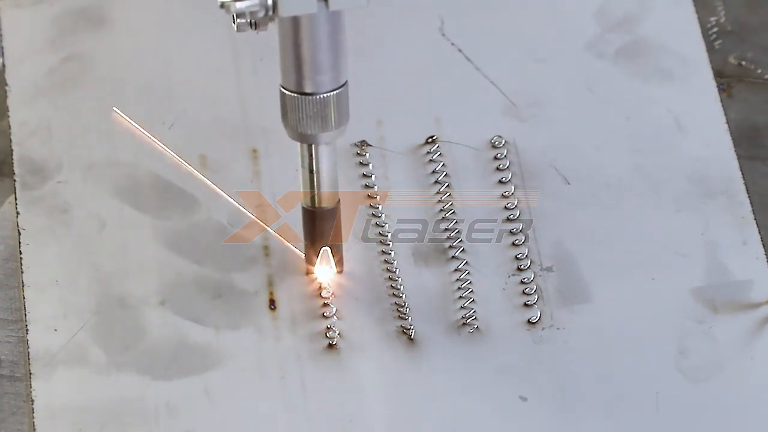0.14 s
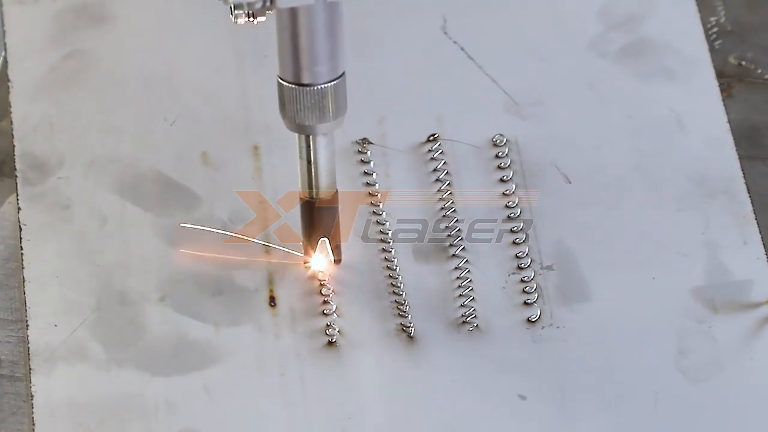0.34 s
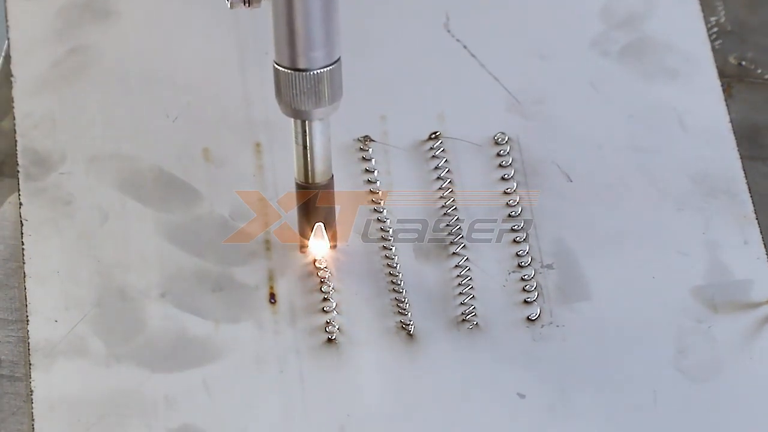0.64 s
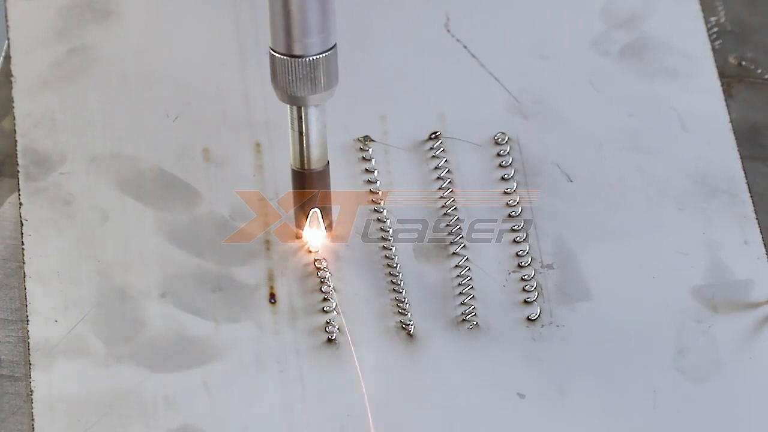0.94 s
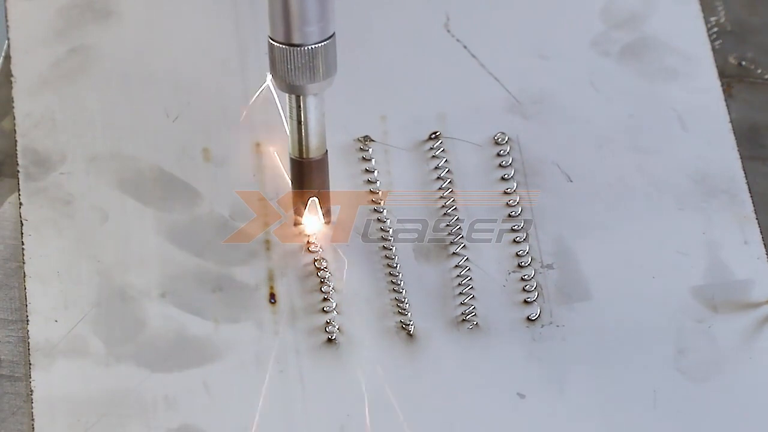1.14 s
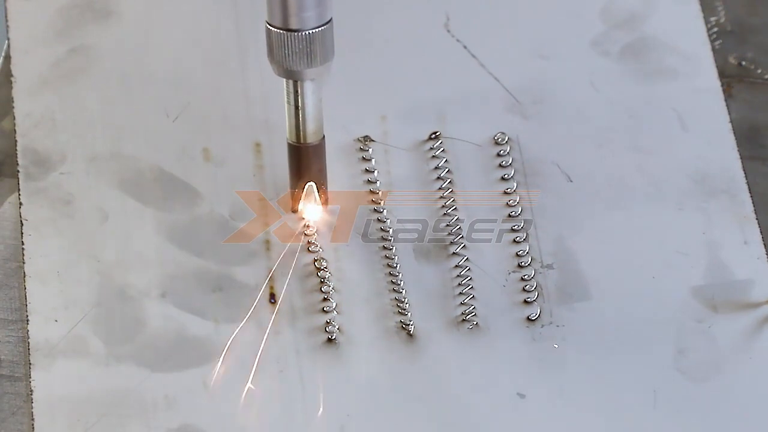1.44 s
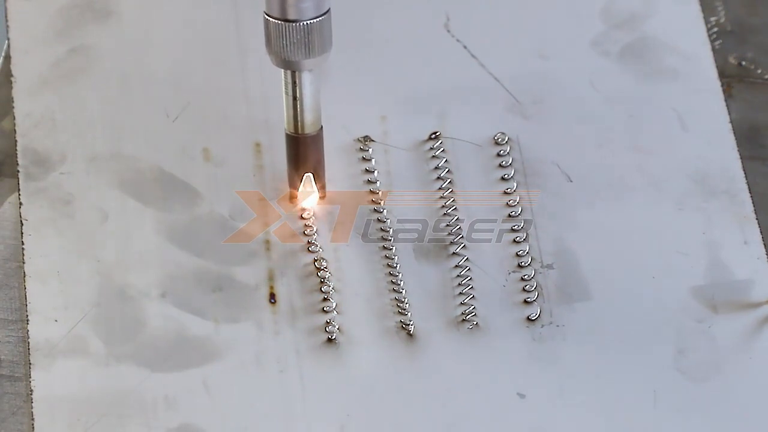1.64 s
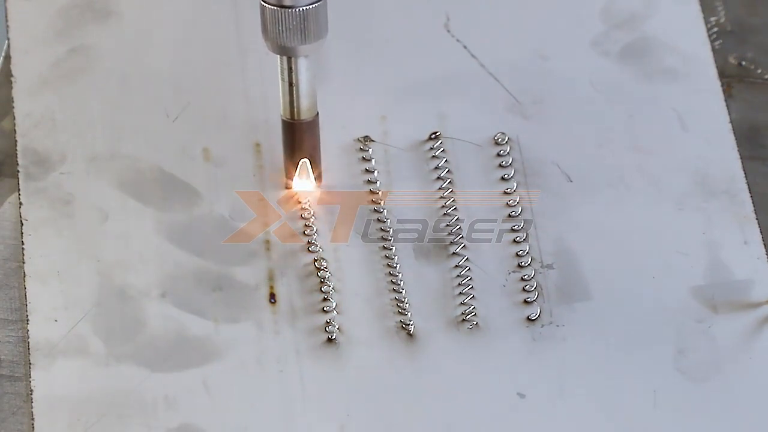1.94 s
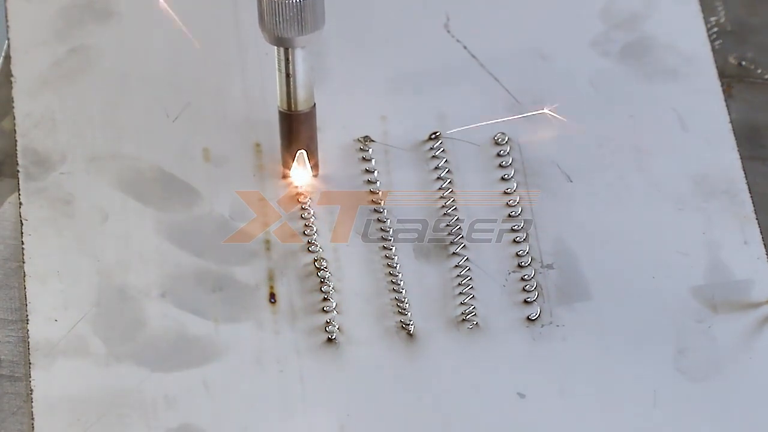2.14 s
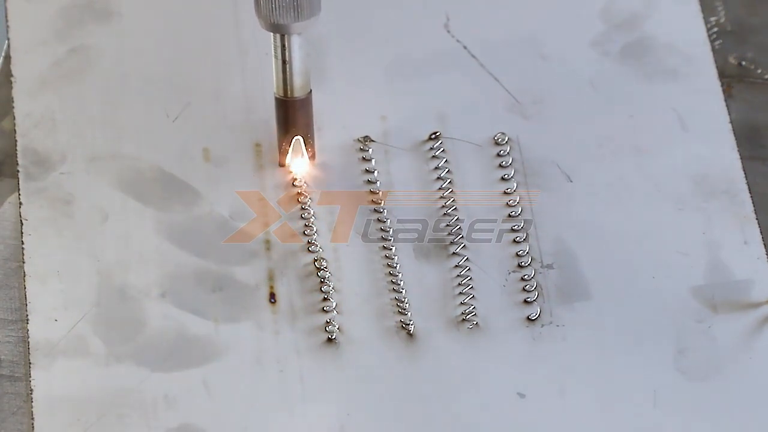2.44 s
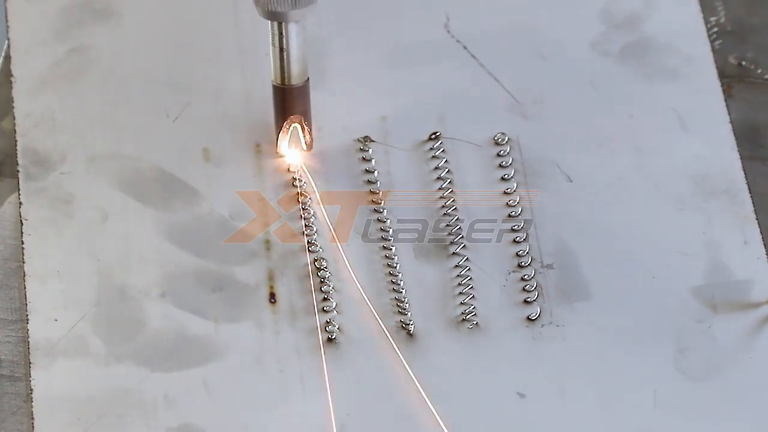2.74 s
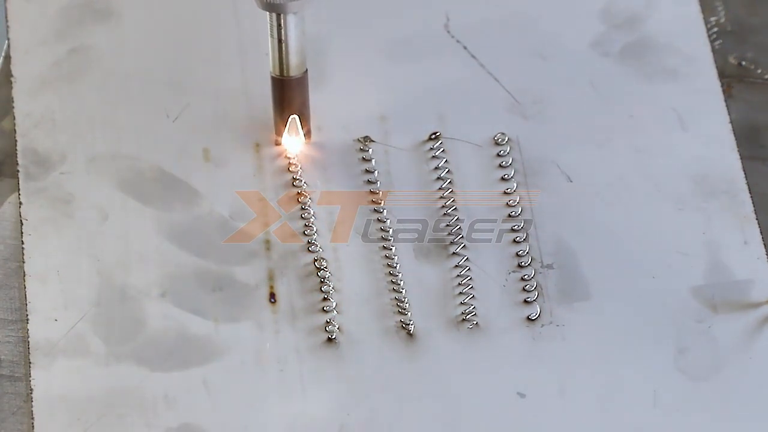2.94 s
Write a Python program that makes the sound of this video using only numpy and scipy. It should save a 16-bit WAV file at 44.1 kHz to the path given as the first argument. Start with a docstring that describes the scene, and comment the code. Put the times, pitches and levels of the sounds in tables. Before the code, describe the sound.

A laser welding head hisses with gas, close, bright and steady, for the whole three seconds, fluttering slightly. Faint, high airy whistles come and go within the hiss, clearest from about 1.4 to 2.2 seconds. From about 2.5 seconds a fine sizzle of sparking metal blends in and lasts to the end. Workshop fans rush low and motors hum faintly in the background throughout.

```python
"""Shielding gas hisses from a laser welding head as it creeps along a wire spring on a steel sheet.
The gas sounds the resonances of the nozzle tube, which drift in strength as the tip passes over the
coils and now and then narrow to airy whistles. Near the end sparks fly and the weld sizzles.
Heard close up on a camera's stereo microphone; farther back the workshop's fans rush and motors hum."""
import sys
import numpy as np
from scipy.fft import rfft, irfft, next_fast_len
from scipy.io import wavfile
from scipy.ndimage import uniform_filter1d, map_coordinates

SR = 44100
rng = np.random.default_rng(int(sys.argv[2]) if len(sys.argv) > 2 else 0)


def inscribe(sig):
    """Save sig as 16-bit PCM at rate SR to the path in sys.argv[1].

    A 1-D sig is mono; a 2-D sig holds one channel per row.
    Samples are clipped to [-1, 1] before scaling.
    """
    pcm = np.round(np.clip(np.atleast_2d(sig).T, -1, 1) * 32767)
    wavfile.write(sys.argv[1], SR, pcm.astype(np.int16))


N = 136710
T = np.arange(N) / SR
FFT_SIZE = next_fast_len(N + 8192)
HZ = np.fft.rfftfreq(FFT_SIZE, 1 / SR)


def amp(db):
    """Decibels to gain."""
    return 10 ** (np.asarray(db) / 20)


def unit_rms(x):
    """x scaled to rms 1."""
    return x / np.sqrt(np.mean(x ** 2) + 1e-20)


def across_hz(points):
    """(freq_hz, value) points joined on a log frequency axis."""
    freq_hz, values = np.transpose(points)
    return np.interp(np.log(HZ + 1), np.log(freq_hz + 1), values)


def wobble(rate_hz):
    """A smooth random curve with rate_hz knots a second."""
    return map_coordinates(rng.standard_normal(1024), [T * rate_hz], mode="wrap")


def filtered(x, gain):
    """x times a gain per frequency."""
    return irfft(rfft(x, FFT_SIZE) * gain, FFT_SIZE)[..., :N]


def stereo_noise(colour, likeness, balance_db=0, lead_rad=0):
    """Coloured noise of rms 1 at the microphone; balance and phase lead are left over right."""
    spread = np.arccos(np.clip(across_hz(likeness), 0, 1)) / 2
    spectra = rfft(rng.standard_normal((2, FFT_SIZE))) * colour
    mid, side = spectra * np.array([np.cos(spread), np.sin(spread)])
    pan = amp(balance_db / 2) * np.exp(.5j * lead_rad)
    left_right = np.array([(mid + side) * pan, (mid - side) / pan])
    return unit_rms(irfft(left_right, FFT_SIZE)[:, :N])


def room(x, echo_s=.00842, echo_db=-19, tail_db=-11, t60_s=.15, positions=4):
    """A near surface reflects once; the workshop's brief ring changes as the head travels."""
    t = T[:SR // 3]
    travel = T / T[-1] * (positions - 1)
    out = x + amp(echo_db) * np.roll(x, round(echo_s * SR), axis=1)
    for position in range(positions):
        tail = rng.standard_normal((2, len(t))) * amp(-60 * t / t60_s) * (t > .003)
        tail = tail + tail[::-1] * 1.25  # left and right ring nearly alike
        tail = tail / np.linalg.norm(tail, axis=1, keepdims=True)
        nearness = np.sqrt(np.clip(1 - abs(travel - position), 0, 1))
        out = out + amp(tail_db) * nearness * irfft(rfft(x) * rfft(tail, N), N)
    return out


# Motor and mains tones at the back of the workshop: pitch_hz, relative_db
HUM_TONES = [(48.4, -87), (100, -83.5), (111.5, -75.5), (140.5, -77.5), (399.5, -74), (466, -88),
             (514, -83), (562, -87.5), (700, -88)]


def motors(waver_db=-1.3, waver_rad=.15, beat_pitch_hz=229.4, beat_peak_s=1.23, beat_period_s=1.29):
    """Motors and mains hum a little unsteadily; one motor swells and fades in a slow beat."""
    hum = np.zeros(N)
    for pitch_hz, db in HUM_TONES:
        gain = amp(db + waver_db * wobble(2.16))
        hum += gain * np.sin(2 * np.pi * (pitch_hz * T + rng.random()) + waver_rad * wobble(3.3))
    beat_db = -73.5 + 4 * np.cos(2 * np.pi * (T - beat_peak_s) / beat_period_s)
    hum += amp(beat_db) * np.sin(2 * np.pi * beat_pitch_hz * T + waver_rad * wobble(3.2))
    return np.sqrt(2) * hum * amp([[.7], [-.7]])  # slightly left


# Fan noise behind the weld: freq_hz, relative_db
FAN_SPECTRUM = [(20, -25), (40, -17), (57, -22), (80, -8), (120, -5), (170, 1.6), (200, -2), (222, -1),
                (245, -4), (295, 2), (315, -3), (345, -1), (380, -6), (440, -3), (520, -5), (700, -9),
                (1100, -11), (3000, -22)]


def fans(level_db=-61):
    """The workshop's fans move air with a low, steady rush."""
    likeness = [(60, .79), (250, 1), (500, .65), (1000, .35)]
    balance_db = across_hz([(150, 3.0), (300, 1.3), (700, -1.0)])
    lead_rad = across_hz([(100, .096), (600, .45)])
    return amp(level_db) * stereo_noise(amp(across_hz(FAN_SPECTRUM)), likeness, balance_db, lead_rad)


def sparking(start_s=2.5, rise_s=.25):
    """How hard the weld throws sparks, 0-1."""
    return np.clip((T - start_s) / rise_s, 0, 1)


# Sizzle at the weld, close up: freq_hz, relative_db
SIZZLE_SPECTRUM = [(1200, -22), (2200, -7), (3200, -10), (4400, -5), (5300, 1), (6400, -9), (7700, -2),
                   (9600, -3), (11000, -6), (12200, -16), (15000, -14)]
# How alike it reaches the two sides of the microphone: freq_hz, likeness_0_to_1
SIZZLE_LIKENESS = [(2000, 0.69), (10000, 0.98)]


def sizzle(level_db=-52.5, surge_db=.3, bursts_per_s=5000):
    """Tiny bursts of molten metal merge into a broad, uneven sizzle."""
    bursts = (rng.random(N) < bursts_per_s / SR) * rng.standard_normal(N)
    grain = np.sqrt(np.abs(uniform_filter1d(bursts ** 2, size=24)))
    spray = unit_rms(grain * stereo_noise(amp(across_hz(SIZZLE_SPECTRUM)), SIZZLE_LIKENESS))
    return amp(level_db + surge_db * wobble(23.8)) * sparking() * spray


# How alike the nozzle reaches the two sides of the microphone: freq_hz, likeness_0_to_1
TUBE_LIKENESS = [(1800, 1), (6100, 1), (8300, 0.91), (12700, 0.7)]


def tube_resonance(pitch_hz, width_hz, balance_db, lead_rad, skirt):
    """Gas noise through one resonance of the tube; a higher skirt makes its flanks steeper."""
    detuning = (HZ - pitch_hz) * 2 / (width_hz * skirt)
    peak = (1 + detuning ** 2) ** (-skirt / 2)
    bass_cut = HZ / (HZ + pitch_hz)
    return stereo_noise(peak * bass_cut, TUBE_LIKENESS, balance_db, lead_rad)


# Whistles at the nozzle tip: start_s, end_s, pitch_hz, width_hz, level_db, balance_db, lead_rad
WHISTLE_EVENTS = [(.19, 1.0, 7330, 120, -55, 9, 1.1), (0.267, 0.983, 3210, 90, -61, 2, 0.016),
                  (.42, 1.4, 8320, 150, -64, -6, 1.4), (1.36, 1.83, 6120, 120, -53.5, -0.5, 0.12),
                  (1.39, 2.3, 4420, 170, -62, 1, 0.045), (1.825, 2.19, 6110, 115, -52.5, -1, 0.38),
                  (2.08, 3.1, 10940, 260, -66, 5, 1.2), (2.32, 2.55, 3160, 130, -61, -3, 0.67)]


def whistles(attack_s=.028, release_s=.14):
    """For a while the jet locks onto a resonance, which narrows to an airy whistle."""
    out = np.zeros((2, N))
    for start_s, end_s, pitch_hz, width_hz, db, balance_db, lead_rad in WHISTLE_EVENTS:
        held = np.clip(np.minimum((T - start_s) / attack_s, (end_s - T) / release_s), 0, 1)
        out += amp(db) * held * tube_resonance(pitch_hz, width_hz, balance_db, lead_rad, skirt=2.3)
    return out


# Nozzle tube resonances, close up: pitch_hz, width_hz, level_db, balance_db, lead_rad, slope_db_per_s
TUBE_MODES = [(1298, 55, -73.5, -4, 1.1, -1.5), (1836, 224, -59, 1, -0.044, 0.8),
              (3243, 286, -57.5, -1, 0.16, -.1), (4414, 435, -55, -1.5, -0.4, 0.5),
              (6110, 260, -54, 1.5, -0.25, 0), (7285, 190, -55, 6, 1.4, -1),
              (8317, 260, -52, -11, 0.96, -1.1), (9360, 200, -60.5, 0, -1.6, -1),
              (11050, 590, -57, -2.5, 1.43, 0.6), (11800, 330, -66.5, 1, -0.18, -3.5),
              (12690, 210, -61.5, 0, -0.29, 0.9), (13600, 410, -63, -2, -0.49, -2)]


def nozzle(drift_db=.5, drift_hz=7.46, sparks_dip_db=-1.2):
    """Turbulence sounds the tube's resonances; each drifts on its own, and all weaken as sparks fly."""
    out = np.zeros((2, N))
    for pitch_hz, width_hz, db, balance_db, lead_rad, slope_db_per_s in TUBE_MODES:
        wander_db = slope_db_per_s * (T - T.mean()) + drift_db * wobble(drift_hz)
        gain = amp(db + wander_db + sparks_dip_db * sparking())
        out += gain * tube_resonance(pitch_hz, width_hz, balance_db, lead_rad, skirt=1.26)
    return out


# Turbulence of the gas jet, close to the microphone: freq_hz, relative_db
JET_SPECTRUM = [(300, -26), (1000, -14.5), (1500, -13.5), (2100, -4), (2400, -4.5), (2700, -4),
                (2950, -1.5), (3500, 0), (3830, -3.5), (4150, -0.5), (5000, -1), (6600, 5), (7800, 0.5),
                (8800, 1.5), (9800, -1), (10400, -2.5), (11500, -5), (12100, -19), (13200, -8.5),
                (14500, -9), (15400, -5.5)]
# How alike it reaches the two sides: freq_hz, likeness (clipped to 0-1 when played)
JET_LIKENESS = [(1000, 2.5), (1500, 0.7), (2200, 0.2), (2900, 2.1), (3800, -0.46), (4600, 1.5), (5400, 1),
                (6600, -0.1), (7300, 0.5), (8000, -0.5), (9000, 0.5), (9800, 0.9), (10400, 0), (11200, 2),
                (12200, 1), (13300, 2), (14200, 1), (15200, 8)]
# Its level, left over right: freq_hz, balance_db
JET_PAN = [(1300, -6), (1800, -10.5), (2300, -6.5), (2900, 6), (3800, -7), (5000, 1.5), (7300, -1),
           (8800, 1), (10200, 0), (12000, 1)]
# Its phase, left ahead of right: freq_hz, lead_rad
JET_PHASE = [(1000, -0.55), (2800, -0.24), (5000, 0.96), (6700, -1.2), (7700, 1.2), (9200, -0.54),
             (10500, -0.24), (12000, -1.1), (15000, 0.9)]


def jet(level_db=-47.5, treble_rise_db_per_s=1.5):
    """Gas strikes the work with a broad hiss that brightens slowly as the head travels."""
    colour = amp(across_hz(JET_SPECTRUM))
    hiss = stereo_noise(colour, JET_LIKENESS, across_hz(JET_PAN), across_hz(JET_PHASE))
    treble = filtered(hiss, 1 / (1 + (9000 / (HZ + 1)) ** 10))
    low = filtered(hiss, 1 / (1 + (HZ / 3000) ** 10))
    middle = hiss - treble - low
    body = middle * amp(.96 * wobble(12)) + low * amp(1.7 * wobble(14))  # each band flickers on its own
    treble_db = treble_rise_db_per_s * (T - T.mean()) + .55 * wobble(4.8)
    return amp(level_db) * (body + treble * amp(treble_db))


# Slow swell of the gas at the welding head, played about its mean: time_s, relative_db
GAS_SWELL = [(0, -44), (.4, -43.5), (.9, -43), (1.4, -43.5), (1.9, -43.5), (2.4, -43), (2.7, -42.5),
             (3.05, -43.5)]


def shielding_gas(flutter_db=.48, flutter_hz=35):
    """One fluttering gas flow drives the jet, the nozzle's resonances and the whistles."""
    swell_db = np.interp(T, *np.transpose(GAS_SWELL))
    flow = amp(swell_db - swell_db.mean() + flutter_db * wobble(flutter_hz))
    return flow * (jet() + nozzle() + whistles())


def scene():
    """Gas and sizzle up close with the room around them, motors and fans behind."""
    return room(shielding_gas() + sizzle()) + motors() + fans()


def record(dry, top_hz=15520):
    """The camera keeps nothing above its band limit."""
    return filtered(dry, HZ < top_hz)


dry = scene()
out = record(dry)
inscribe(out)
```